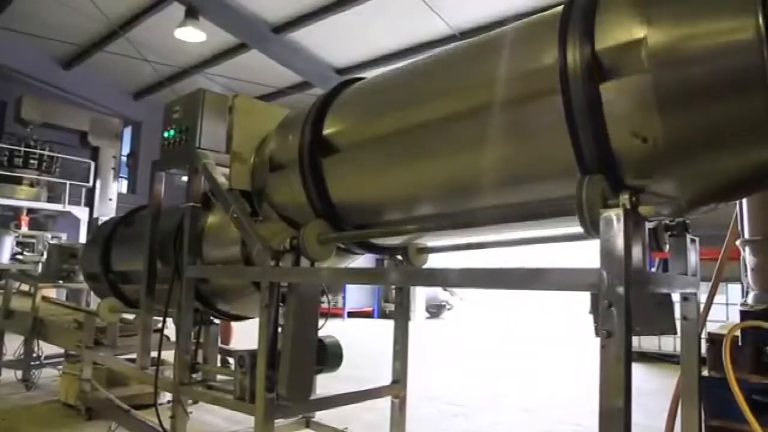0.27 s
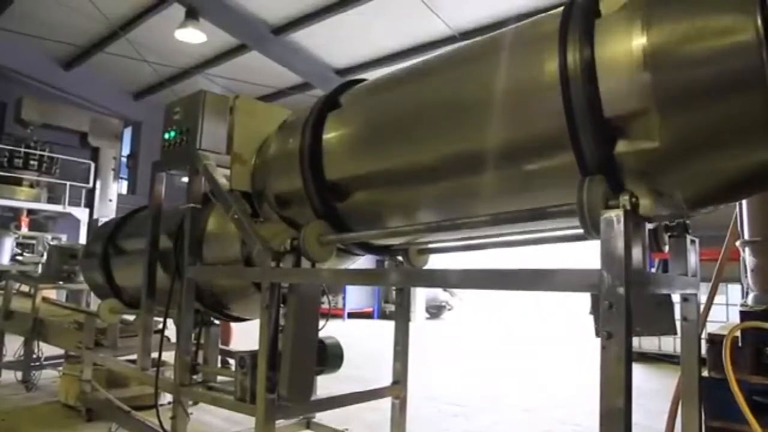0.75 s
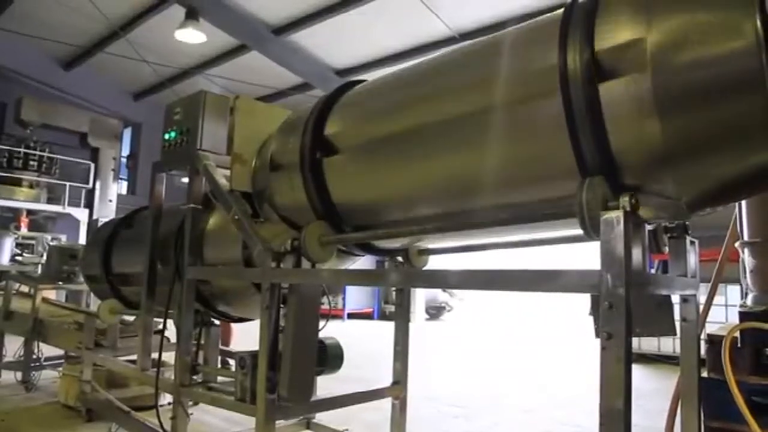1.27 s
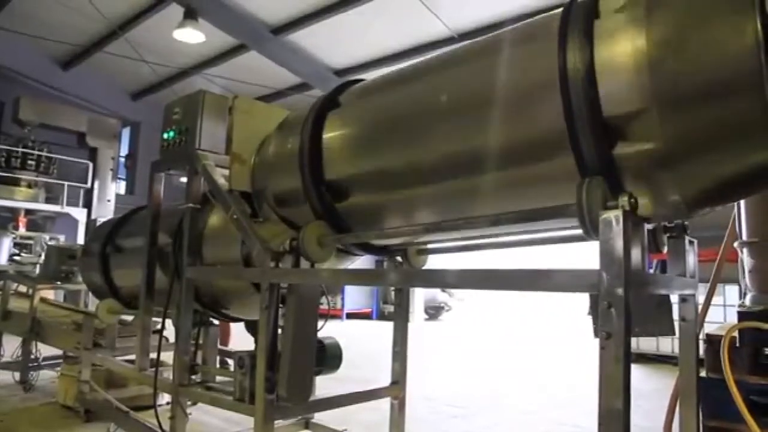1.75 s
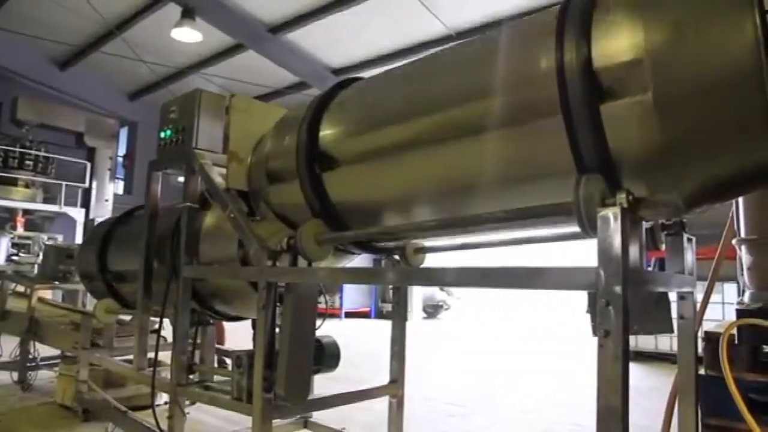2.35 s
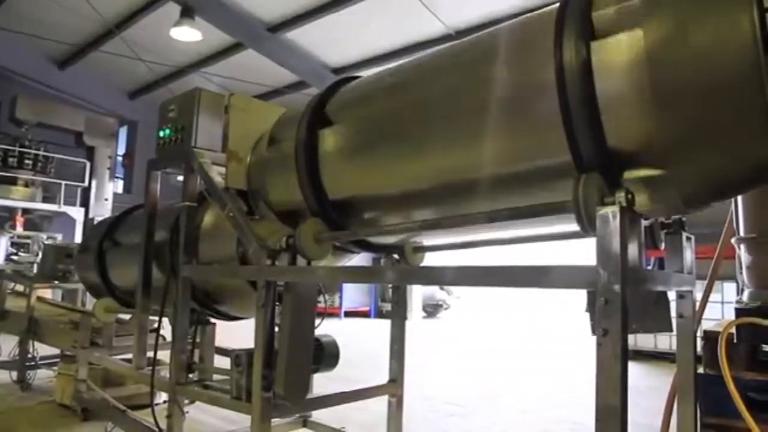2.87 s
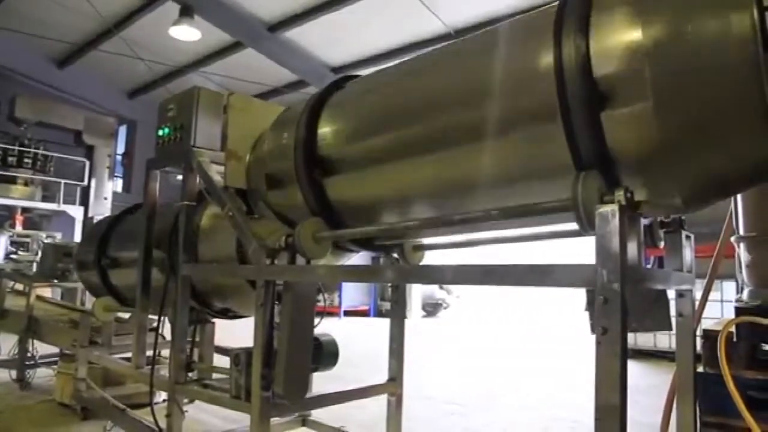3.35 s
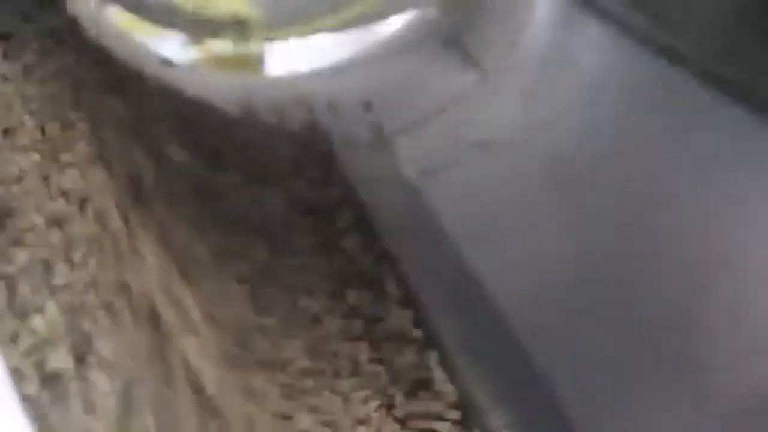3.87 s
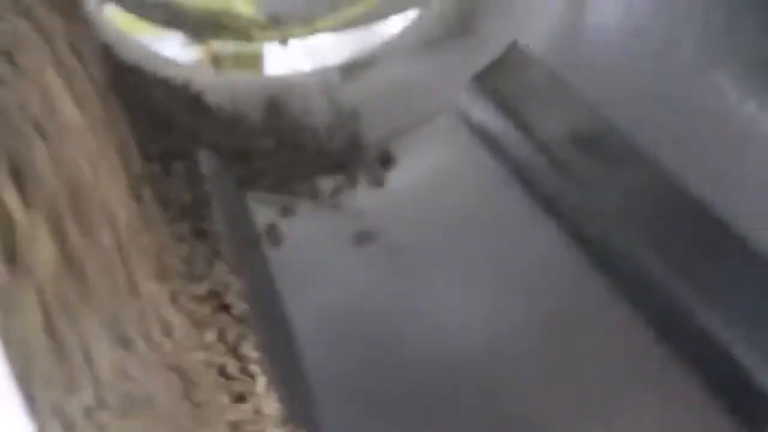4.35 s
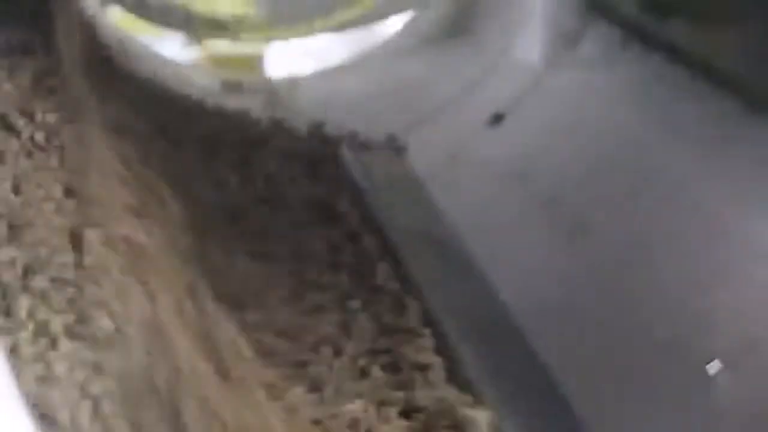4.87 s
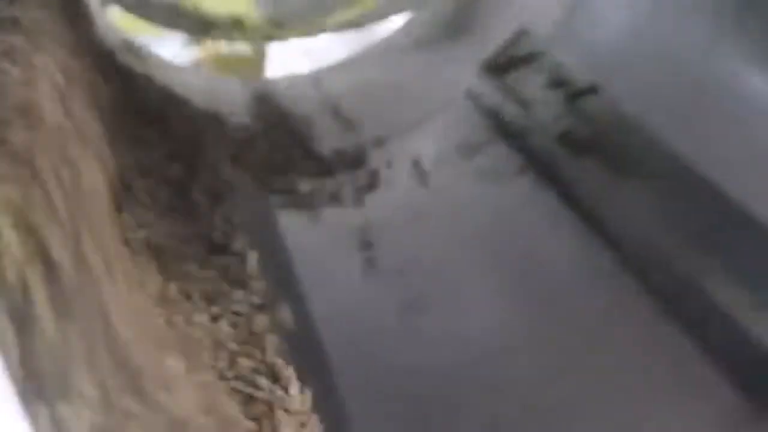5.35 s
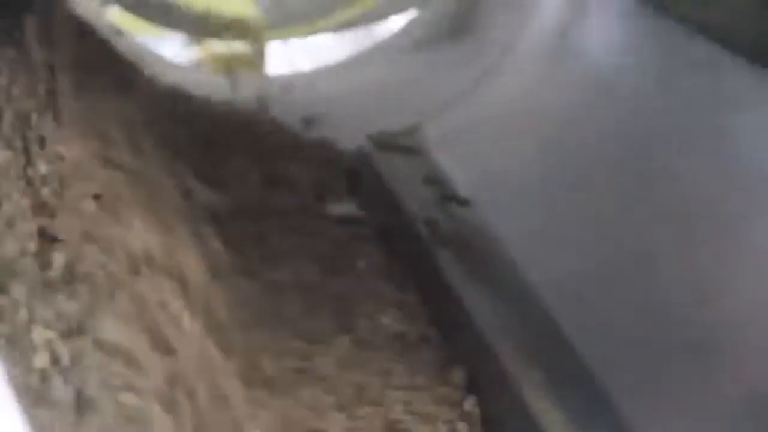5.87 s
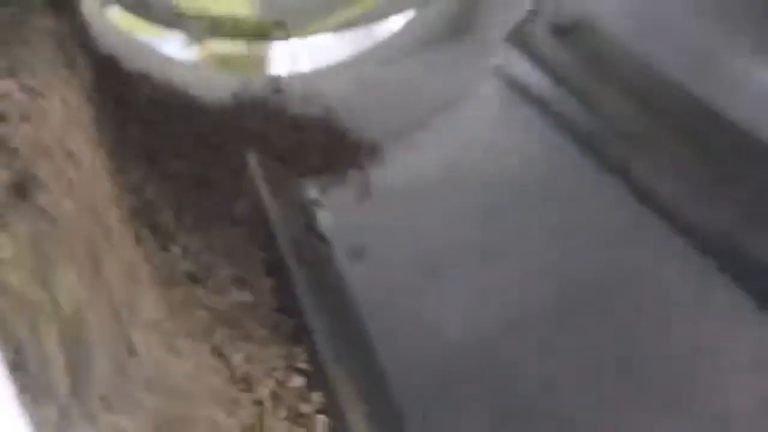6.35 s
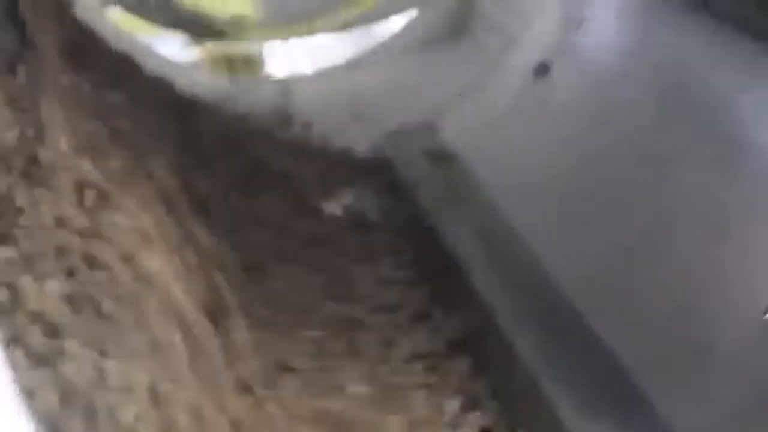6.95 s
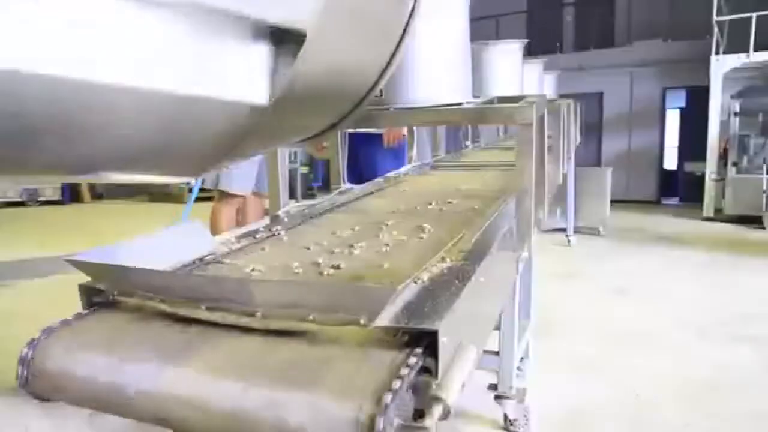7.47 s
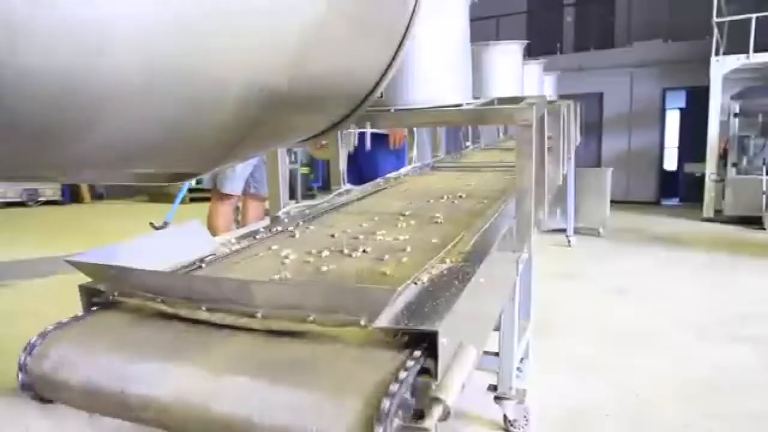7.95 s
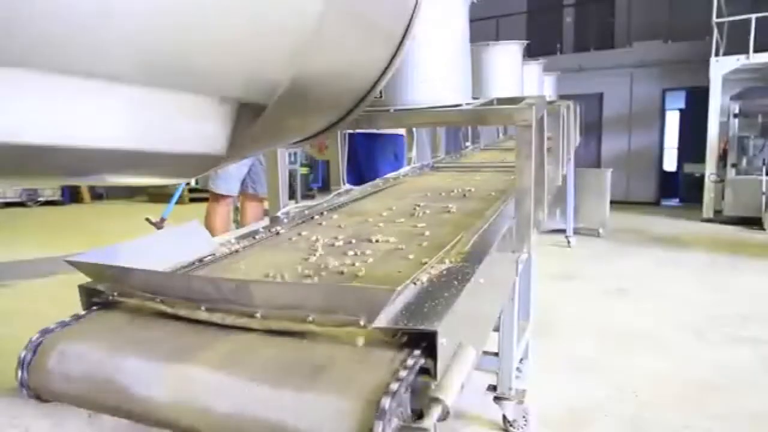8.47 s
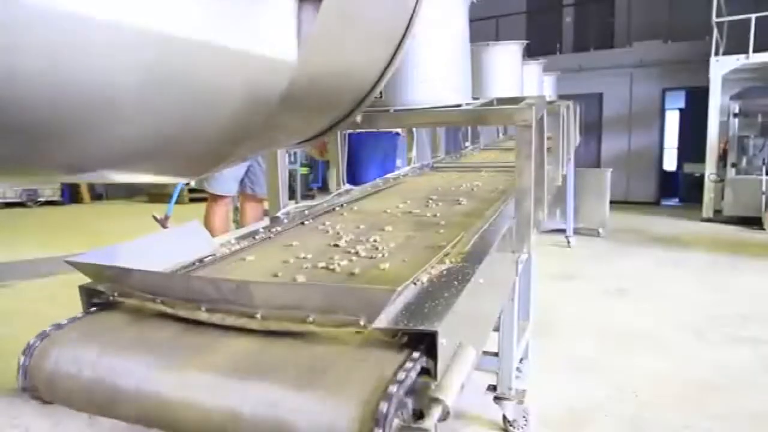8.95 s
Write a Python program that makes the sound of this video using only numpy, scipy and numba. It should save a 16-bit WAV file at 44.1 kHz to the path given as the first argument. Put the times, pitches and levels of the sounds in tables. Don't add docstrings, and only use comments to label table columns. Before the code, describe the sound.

From 0 to about 4 seconds, close beside a turning steel drum in a factory hall, countless dry pellets merge into a thick, gritty rush like heavy hail, lightly ringing the metal shell, with small swells and a faint steady motor hum beneath. Around 3.9 to 4.6 seconds it cross-fades to the open mouth: the rush is just as full but more hollow, its colour sliding up and down as blades hold back and spill the heap about once a second. Small bursts land together, and tiny bright ticks of single pellets on steel come near 6.1, 7.2 and 7.7. From 7.6 it recedes, and by 8.4 only a much quieter, dull belt patter remains, leaning left. It thins briefly around 8.5; from 8.65 the frame rumbles and knocks rapidly, knocks becoming sparser until the end near 9.2.

```python
import sys
import numpy as np
from scipy import signal
from scipy.fft import rfft, irfft, next_fast_len
from scipy.io import wavfile
from scipy.ndimage import uniform_filter1d
from numba import njit

SR = 44100
rng = np.random.default_rng(int(sys.argv[2]) if len(sys.argv) > 2 else 0)


def store_pcm(level_fs):
    pcm = np.round(np.clip(level_fs, -1, 1) * 32767).astype(np.int16)
    wavfile.write(sys.argv[1], SR, np.atleast_2d(pcm).T)


def to_linear_factor(level_db):
    exponent = np.asarray(level_db, float) / 20
    return 10 ** exponent


N = 405719


def over(table, hz):
    points = np.array(table)
    return np.interp(np.log(hz), np.log(points[:, 0]), points[:, 1])


def walk(rate_hz, size):
    hold = int(SR / rate_hz)
    steps = np.repeat(rng.standard_normal(size // hold + 1), hold)[:size]
    return np.sqrt(2) * uniform_filter1d(uniform_filter1d(steps.astype(np.float32), hold), hold)


def pellets(size, share, scatter_db):
    strike = rng.random(size) < np.clip(share, .01, 1)
    hail = rng.standard_normal(size) * strike * to_linear_factor(scatter_db * rng.exponential(size=size))
    return hail / hail.std()


@njit
def ridge(x, hz, width_hz):
    y, band, low = np.empty(len(x)), 0., 0.
    for i in range(len(x)):
        g, k = np.tan(np.pi * hz[i] / SR), width_hz / hz[i]
        v = (band + g * (x[i] - low)) / (1 + g * (g + k))
        band, low, y[i] = 2 * v - band, low + 2 * g * v, k * v
    return y


# resonance in Hz, width in Hz.
POCKETS = [(2620, 370), (3430, 530)]


def hollows(ears, hollow_hz, gain):
    hollow_hz = uniform_filter1d(hollow_hz, size=2000)
    (lower_hz, _), (upper_hz, _) = POCKETS
    upper = np.clip((hollow_hz - lower_hz) / (upper_hz - lower_hz), 0, 1)
    rings = 0
    for share, (f, width_hz) in zip((1 - upper, upper), POCKETS):
        centre_hz = f + 0.15 * (hollow_hz - f)
        rings = rings + share * np.array([ridge(ear, centre_hz, 1. * width_hz) for ear in ears])
    return (ears + gain * rings) / (1 + 0.2 * gain)


def place(flow, start_s, end_s, colour, modes, width, lean, share, scatter_db, swell_db, flicker_db,
          narrow_db, hollow, bass_hz):
    first, size = int(start_s * SR), next_fast_len(int((end_s - start_s) * SR) + 1)
    t = start_s + np.arange(size) / SR
    hz = np.maximum(np.fft.rfftfreq(size, 1 / SR), 1)
    shell = 1 + sum((to_linear_factor(db) - 1) / (1 + 2j * (hz - f) / width_hz) for f, width_hz, db in modes)
    body = to_linear_factor(over(colour, hz)) * shell
    core = (hz > 1500) & (hz < 6000)
    body = body / np.sqrt(np.sum(np.abs(body[core]) ** 2) * 2 / size)
    mid = rfft(pellets(size, share, scatter_db)) * body
    side = rfft(pellets(size, share, scatter_db)) * body * to_linear_factor(over(width, hz) + narrow_db)
    tilt = to_linear_factor(over(lean, hz) / 2)
    spectra = np.array([(mid + side) * tilt, (mid - side) / tilt])
    rush, rumble, hiss, sizzle, hollow_hz = flow(t)
    out, swell = 0, swell_db * walk(9., size)
    for step in range(18):
        centre = 45 * 2 ** (step / 2)
        octaves = np.log2(np.clip(hz, 45, 16290) / centre)
        band = np.cos(np.pi * np.clip(octaves, -.5, .5)) ** 2
        low = np.clip(np.log2(bass_hz / centre), 0, 1)
        high = np.clip(np.log2(centre / 5500) * 2, 0, 1)
        flicker = flicker_db * (1 + high) * walk(7., size)
        db = rush + low * rumble + (centre > 5000) * hiss + high * sizzle + swell + flicker
        out = out + irfft(spectra * band, size) * to_linear_factor(db)
    return np.pad(hollows(out, hollow_hz, hollow), ((0, 0), (first, N)))[:, :N]


STEADY_BASS, STEADY_HISS = 0.4, 0.4
# time in seconds, level in dB, loose pellets over the rush in dB, hollow in Hz.
BESIDE_FLOW = [(0, -33, -4, 3500), (.2, -34, -1.5, 3500), (.36, -35.5, -0.5, 3500), (.55, -35, 1.5, 3600),
               (.8, -34.5, 1, 3600), (.95, -33, -0.5, 3700), (1.15, -33.5, 1.5, 3700),
               (1.4, -35, 1.5, 3700), (1.6, -34, 0.5, 3280), (1.8, -33, 1.5, 3100),
               (2.05, -34.5, 1.5, 3600), (2.25, -35, -1.5, 3700), (2.42, -33.5, -2.5, 3600),
               (2.55, -32.5, -3.5, 2700), (2.68, -33.5, 1, 3700), (2.8, -33.5, -0.5, 3400),
               (2.95, -34, 0.5, 3400), (3.2, -32.5, -1.5, 3400), (3.3, -32.5, -2, 3700),
               (3.45, -33.5, -1.5, 3500), (3.7, -34.5, 0.0, 3500), (3.9, -34, -0.5, 3300),
               (4.15, -34.5, -4.5, 3600), (4.3, -34.5, -5, 3600)]


def beside_flow(t):
    s, level_db, loose_db, hollow_hz = np.transpose(BESIDE_FLOW)
    rush = np.interp(t, s, level_db)
    surge = rush - rush.mean()
    loose = np.interp(t, s, loose_db - loose_db.mean()) + 0.87 * walk(16.0, len(t))
    return rush, -STEADY_BASS * surge, -STEADY_HISS * surge, loose, np.interp(t, s, hollow_hz) + 60 * walk(5., len(t))


# frequency in Hz, density in dB per Hz.
BESIDE_COLOUR = [(15, -70), (25, -28), (64, -37.5), (157, -14.5), (261, -11.5), (392, -7.5), (486, -12),
                 (709, -5.5), (769, -6.5), (1120, -4.5), (1590, -3.5), (3880, -2), (7020, -5.5),
                 (9190, -12), (15800, -33)]
# frequency in Hz, width in Hz, height over the rush in dB.
BESIDE_MODES = [(162, 41, 3.5), (313.5, 11.6, 8.5), (345, 12, 3.5), (396, 14, -4), (531.6, 5.6, 5.5),
                (734, 6.2, 7.5), (880, 6, 4), (1120, 8.3, 7), (3850, 330, 3), (7100, 710, -5)]
# frequency in Hz, side minus mid in dB.
BESIDE_WIDTH = [(30, -1), (60, 8), (110, -9), (200, -13.5), (380, -11.5), (700, -8.5), (1290, -8.5),
                (2380, -7.5), (4400, -7), (8120, -1), (15000, -2.5)]
# frequency in Hz, left minus right in dB.
BESIDE_LEAN = [(60, 0.0), (110, -1), (200, 0.5), (380, 0.38), (700, -0.39), (1290, -1.5), (2380, -0.5),
               (4400, -1.5), (8120, 0.62), (15000, 0.0)]


def beside_drum():
    return place(beside_flow, 0, 4.6, BESIDE_COLOUR, BESIDE_MODES, BESIDE_WIDTH, BESIDE_LEAN,
                 share=.85, scatter_db=0.6, swell_db=0.34, flicker_db=0.15, narrow_db=-.3,
                 hollow=0.22, bass_hz=1200)


def motors(lines, wander_hz):
    hum = 0
    for hz, db in lines:
        turns = np.cumsum(hz + wander_hz * walk(3.064, N)) / SR
        hum = hum + np.sqrt(2) * to_linear_factor(db) * np.sin(2 * np.pi * turns)
    return hum


# frequency in Hz, level in dB rms.
BESIDE_HUM = [(392.8, -55.5), (538.3, -64), (882.9, -62)]


def beside_hum():
    return motors(BESIDE_HUM, wander_hz=.3)


LEAVE_S, LEAVE_DB_PER_S = 7.574, -15.5


def leaving_db(t):
    return LEAVE_DB_PER_S * np.maximum(t - LEAVE_S, 0)


# time in seconds, level in dB, hollow in Hz, loose pellets in dB.
MOUTH_FLOW = [(4.25, -43.5, 3740, 2), (4.35, -35, 2600, -1), (4.5, -35.5, 2650, -1),
              (4.62, -34, 2700, -0.5), (4.75, -34.5, 3070, -2), (4.92, -33.5, 3000, -3),
              (5.04, -33, 3600, -3), (5.13, -34, 3480, -1.5), (5.23, -33.5, 3760, -2.5),
              (5.33, -31.5, 2750, -2), (5.4, -32, 2600, -0.5), (5.47, -32.5, 2650, 0.5),
              (5.55, -32, 2600, -1.3), (5.68, -33, 2780, -0.5), (5.85, -33, 3000, -1.5),
              (6.0, -32.5, 3400, -1.5), (6.1, -33.5, 3200, -2.5), (6.2, -34, 3500, -2.5),
              (6.27, -36, 3700, -2), (6.33, -34, 3500, -0.5), (6.42, -33, 2900, 0.5),
              (6.62, -32.5, 3000, 0), (6.8, -33.5, 3220, -0.5), (7.0, -33, 3300, -1),
              (7.12, -33, 3300, -2.5), (7.3, -34.5, 3700, -1.5), (7.45, -32.5, 3300, -1.5),
              (7.54, -32.5, 3000, -0.7), (7.6, -32.5, 3200, -0.5), (7.68, -31, 3300, -0.5),
              (7.76, -32.5, 2700, 0), (7.83, -31.5, 2600, -1.5), (8.0, -32, 2900, -1.5),
              (8.15, -30.5, 3200, -1)]
# time in seconds, height over the rush in dB.
SPILLS = [(5.219, 3), (5.328, 1.5), (5.52, 2), (5.586, 0.5), (5.957, 0.5), (6.007, 2), (6.4, 1.5),
          (6.622, 1.5), (7.005, 1), (7.187, 1), (7.461, 0.5), (7.526, 2.5), (7.553, 0.5), (7.653, 1.5)]
SPILL_DECAY_S = 0.014


def mouth_flow(t):
    s, *controls = np.transpose(MOUTH_FLOW)
    rush, hollow_hz, loose = (np.interp(t, s, c) for c in controls)
    for spill_s, db in SPILLS:
        rush = rush + db * (t > spill_s) * np.exp(-np.maximum(t - spill_s, 0) / SPILL_DECAY_S)
    surge = rush - rush.mean()
    sizzle = loose + .5 * walk(9.5, len(t))
    hollow_hz = hollow_hz + 50 * walk(4.47, len(t))
    return rush + leaving_db(t), -STEADY_BASS * surge, -STEADY_HISS * surge, sizzle, hollow_hz


# frequency in Hz, density in dB per Hz.
MOUTH_COLOUR = [(15, -74), (25, -32), (53, -42), (165, -17.5), (254, -15.5), (352, -13), (436, -13.5),
                (541, -9.5), (980, -6.5), (1350, -4.5), (1730, -5.5), (2730, -0.5), (9450, -12),
                (11100, -20.5), (15800, -41)]
# frequency in Hz, width in Hz, height over the rush in dB.
MOUTH_MODES = [(179, 28, 2.8), (318, 15.5, 7.2), (356, 5.1, 5.3), (389.5, 5.9, 7.6), (543, 13, 3.7),
               (890, 4.1, 3), (1392, 5.4, 7.5), (1383, 10.6, 4.7), (1567, 18, 3.8), (1892, 13, 6.1),
               (2610, 33, 0.53), (3530, 74, 0.94), (3700, 90, 3.9)]
# frequency in Hz, side minus mid in dB.
MOUTH_WIDTH = [(30, 0.0), (60, -5), (130, -11), (200, -12.5), (700, -10), (1300, -17.5), (3500, -15.5),
               (5500, -3.5), (7000, -0.5), (8500, -10), (11500, -11), (13000, 6.5), (15800, 5)]
# frequency in Hz, left minus right in dB.
MOUTH_LEAN = [(60, 0.5), (110, 1.0), (200, 1.5), (380, 1.0), (700, 0.8), (1290, 0.0), (2380, 0.033),
              (4400, 0.59), (8120, 1.1), (15000, 0.0)]


def drum_mouth():
    return place(mouth_flow, 3.85, 12.7, MOUTH_COLOUR, MOUTH_MODES, MOUTH_WIDTH, MOUTH_LEAN,
                 share=.8, scatter_db=0.63, swell_db=0.24, flicker_db=0.19, narrow_db=-.3,
                 hollow=0.5, bass_hz=2300)


# frequency in Hz, level in dB rms.
MOUTH_HUM = [(360.7, -63), (392.8, -71), (541, -64), (885, -62.5)]


def mouth_hum(t):
    return motors(MOUTH_HUM, wander_hz=.6) * to_linear_factor(leaving_db(t))


def strikes(events, t60_s, contact_s, length):
    out, t = np.zeros((2, N + length)), np.arange(length) / SR
    envelope = np.exp(-np.log(1000) * t / t60_s) * (1 - np.exp(-t / contact_s))
    for s, db, hz, *pan_db in events:
        ring = np.sin(2 * np.pi * hz * t) + 0.25 * np.sin(2 * np.pi * hz * 0.69 * t)
        lean = to_linear_factor(np.array([[sum(pan_db)], [-sum(pan_db)]]) / 2)
        out[:, int(s * SR):int(s * SR) + length] += ring * envelope * to_linear_factor(db) * lean
    return signal.sosfilt(signal.butter(4, 170, "high", fs=SR, output="sos"), out[:, :N])


# time in seconds, peak in dB, frequency in Hz.
TICKS = [(6.0995, -38, 13400), (7.1681, -33, 13000), (7.7483, -41, 13300), (7.9808, -41, 12800)]


def lone_pellets():
    return to_linear_factor(5) * strikes(TICKS, t60_s=0.004, contact_s=.0002, length=512)


BELT_DB, BELT_CLIMB_DB_PER_S, BELT_HOLLOW_HZ = -52.5, 6, 3530
GAP_S, GAP_HALF_S, GAP_DB = 8.48, .09, -1
SHAKE_S, SHAKE_ATTACK_S, SHAKE_HOLD_S, SHAKE_DECAY_S = 8.648, .04, 0.16, 0.1
SHAKE_CALM_DB, SHAKE_DB, SHAKE_REST_DB = -5, 5, 0.5


def belt_flow(t):
    since = np.maximum(t - SHAKE_S, 0)
    rise = np.clip(since / SHAKE_ATTACK_S, 0, 1)
    settle = np.exp(-(np.maximum(since - SHAKE_HOLD_S, 0) / SHAKE_DECAY_S) ** 2)
    top = SHAKE_REST_DB + (SHAKE_DB - SHAKE_REST_DB) * settle
    rumble = SHAKE_CALM_DB + rise * (top - SHAKE_CALM_DB)
    gap = GAP_DB * np.exp(-((t - GAP_S) / GAP_HALF_S) ** 2)
    return BELT_DB + gap + BELT_CLIMB_DB_PER_S * since, rumble, 0 * t, 0 * t, BELT_HOLLOW_HZ + 0 * t


# frequency in Hz, density in dB per Hz.
BELT_COLOUR = [(15, -87), (25, -59), (120, -29), (184, -16), (291, -14), (603, -10), (690, -11.5),
               (833, -11.5), (928, -9.5), (1550, -12), (3500, -13), (5810, -15), (11400, -36), (12400, -48),
               (15800, -52)]
# frequency in Hz, width in Hz, height over the rush in dB.
BELT_MODES = [(347, 26.7, 3.2), (600, 40, 2.5), (830, 36, 5), (1920, 13, 2.4)]
# frequency in Hz, side minus mid in dB.
BELT_WIDTH = [(60, -2), (110, 6), (200, -7.5), (380, -5), (700, -2), (1290, -3), (2380, 0), (4400, -1),
              (8120, 0), (15000, 6)]
# frequency in Hz, left minus right in dB.
BELT_LEAN = [(60, 5.5), (110, 7.5), (200, 12), (380, 13), (700, 5.9), (1290, 8), (2380, 9.9), (4400, 7.5),
             (8120, 6.9), (15000, 7.6)]


def belt_below():
    return place(belt_flow, 7.95, 9.21, BELT_COLOUR, BELT_MODES, BELT_WIDTH, BELT_LEAN,
                 share=.8, scatter_db=0.78, swell_db=.4, flicker_db=0.31, narrow_db=-4.5,
                 hollow=0.32, bass_hz=1430)


# time in seconds, peak in dB, frequency in Hz, left minus right in dB.
KNOCKS = [(8.668, -42, 330, 16), (8.7, -49, 560, 10), (8.722, -40, 830, 8.0), (8.752, -41, 490, 12),
          (8.762, -40, 640, 10), (8.783, -41, 880, 8), (8.769, -34.5, 830, 7.5), (8.81, -49, 345, 12),
          (8.847, -39, 830, 12), (8.85, -45, 340, 12), (8.895, -46, 580, 11), (8.959, -38, 865, 7.5),
          (9.019, -50, 396, 10.0), (9.189, -38, 378, 12)]


def frame_knocks():
    return to_linear_factor(-2.5) * strikes(KNOCKS, t60_s=0.05, contact_s=0.002, length=4096)


# middle in seconds, length in seconds.
FADES = [
    (4.22, 0.74),
    (8.168, 0.47),
]


def scene():
    t = np.arange(N) / SR
    one, two = (np.clip((t - mid) / length + .5, 0, 1) * np.pi / 2 for mid, length in FADES)
    at_drum, at_mouth, at_belt = np.cos(one), np.sin(one) * np.cos(two), np.sin(two)
    rush = beside_drum() * at_drum + drum_mouth() * at_mouth + belt_below() * at_belt
    hum = beside_hum() * at_drum + mouth_hum(t) * at_mouth
    return rush + hum + frame_knocks() + lone_pellets()


def sudden(dry):
    top = signal.sosfiltfilt(signal.butter(6, 12300, "high", fs=SR, output="sos"), dry)
    power = top.mean(axis=0) ** 2
    gate = uniform_filter1d(power, size=100) > 4.5 * uniform_filter1d(power, size=4000)
    return top * np.minimum(2 * uniform_filter1d(1. * gate, size=200), 1)


# time in seconds, ease in spreads of luck.
SPARE = [(4.38, 1.2), (5.0, 1), (5.97, 1.5), (6.3, 2.2), (6.78, 1.2), (7.06, 1.3), (7.26, 1), (7.66, .8),
         (8.14, 1)]


def starve(x, early, late, common, keen, grain_db):
    hz, t, cells = signal.stft(np.pad(x, (825, 0)), SR, "cosine", 2048, 1024)
    bins = np.arange(len(hz))
    band = np.where(bins < 224, bins // 14, bins // 32 + 9)
    luck = rng.standard_normal((band.max() + 1, len(t))) + common * rng.standard_normal(len(t))
    luck = uniform_filter1d(luck, size=2, axis=1)
    edges = np.flatnonzero(np.diff(band, prepend=-1))
    power_db = 10 * np.log10(np.add.reduceat(np.abs(cells) ** 2, edges) + 1e-18)
    luck = luck / luck.std() + keen * (power_db - uniform_filter1d(power_db, size=15, axis=1))
    luck = luck[band]
    turn = np.clip((t - FADES[0][0]) / FADES[0][1] + 0.05, 0, 1)
    centre = (np.bincount(band, hz) / np.bincount(band))[band]
    need = np.outer(over(early, centre), 1 - turn) + np.outer(over(late, centre), turn)
    need = need - 3.2 * np.clip((t - FADES[1][0]) / FADES[1][1] * 2, 0, 1)
    need = need - np.outer(hz > 12900, sum(1.3 * k * (np.abs(t - s) < .025) for s, k in SPARE))
    bin_luck = uniform_filter1d(rng.standard_normal(cells.shape), size=3, axis=0)
    lack = need - luck - .75 * (hz > 10500)[:, None] * bin_luck
    keep = 1 / (1 + np.exp(np.clip(16 * lack, -30, 30)))
    keep = keep / np.sqrt(uniform_filter1d(keep ** 2, size=41, axis=1) + .12)
    grain = to_linear_factor(grain_db * np.clip(hz / 12000, .25, 1)[:, None] * rng.standard_normal(cells.shape))
    grain = grain * to_linear_factor(0.7 * np.clip(luck, -2, 2))
    return signal.istft(cells * keep * grain, SR, "cosine", 2048, 1024)[1][825:825 + N]


def band_limit(x):
    return signal.sosfilt(signal.butter(12, 15800, fs=SR, output="sos"), x)


# frequency in Hz, then threshold in spreads of luck for
STARVE = [(300, -4, -1.8, -4, -1.8), (1300, -4, -1.7, -4, -.2), (4000, -4, -2, -4, -.1),
          (5200, -4, -2.3, -4, -2.6), (6600, -2.8, -2, -3, -2.6), (7240, -.15, -.1, -1.4, -1.2),
          (8000, -1.2, -.1, -1.3, .8), (10000, -1.2, .2, -2.2, 1.1), (11500, -.6, .4, .2, 1.4),
          (12600, .3, .1, 3, 0), (14200, -.3, -.5, 2.9, -.8), (15300, 1.4, 2.3, 3.4, 3)]


def record(dry):
    table, clicks = np.array(STARVE), sudden(dry)
    dry = dry - clicks
    mid = starve(dry.mean(axis=0), table[:, [0, 1]], table[:, [0, 3]], common=.1, keen=.1, grain_db=7.)
    side = starve((dry[0] - dry[1]) / 2, table[:, [0, 2]], table[:, [0, 4]], common=.5, keen=.2, grain_db=5.5)
    return band_limit(np.array([mid + side, mid - side]) + clicks)


dry = scene()
out = record(dry)
store_pcm(out)
```